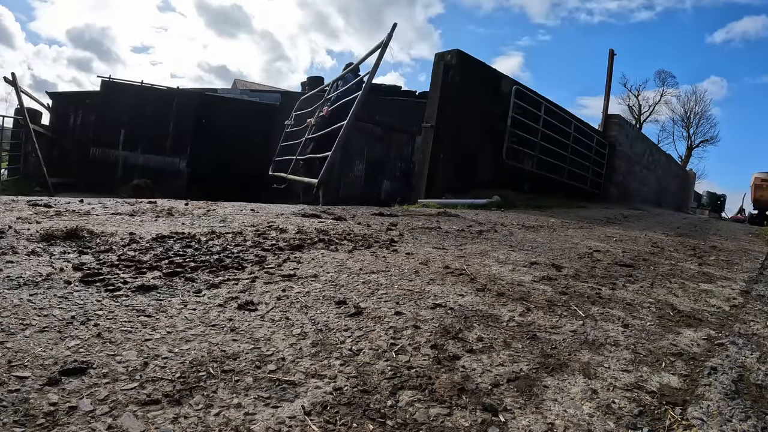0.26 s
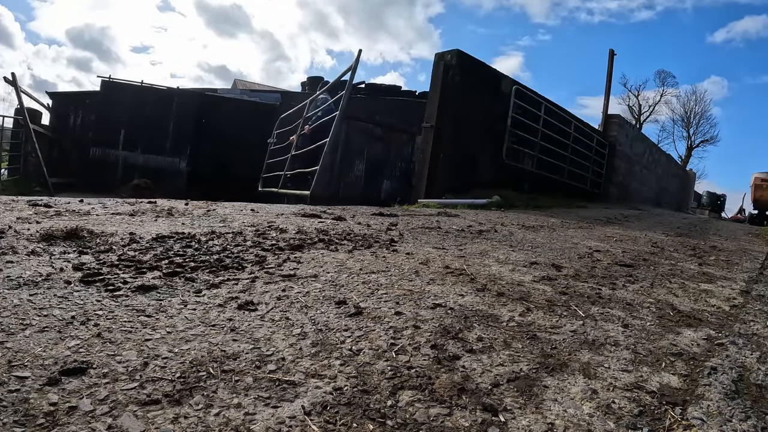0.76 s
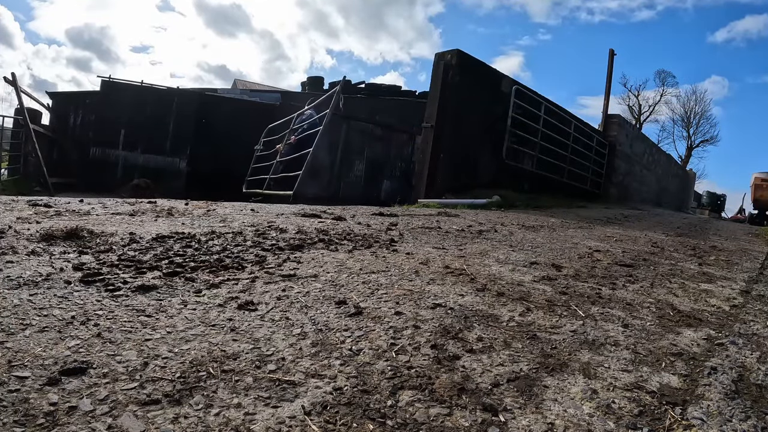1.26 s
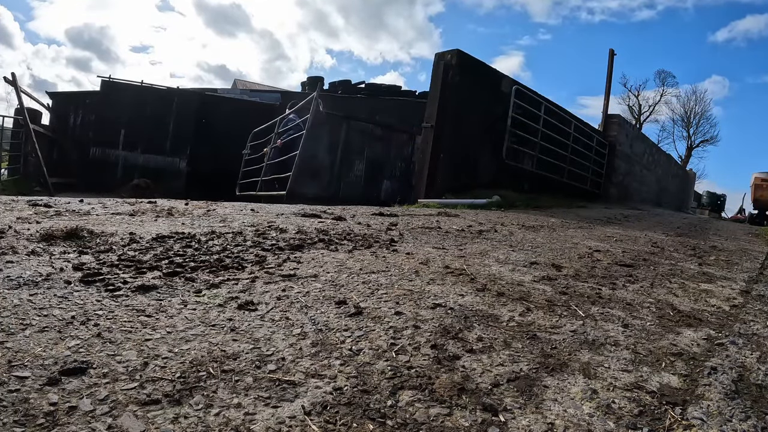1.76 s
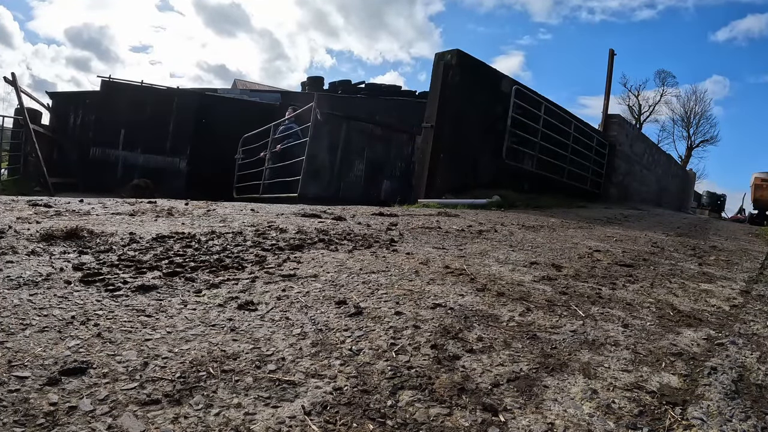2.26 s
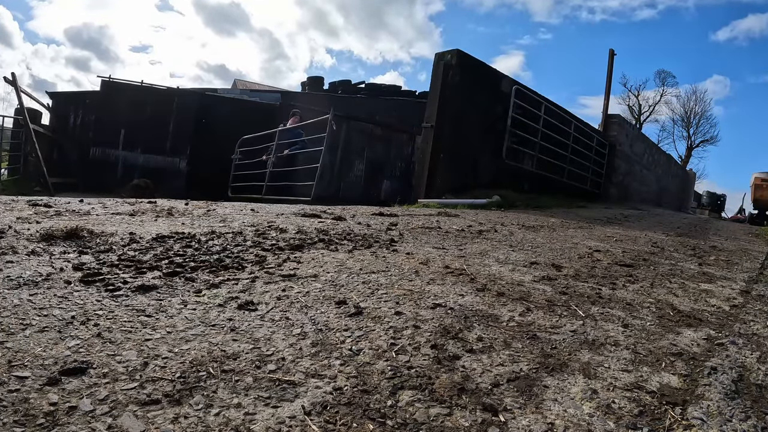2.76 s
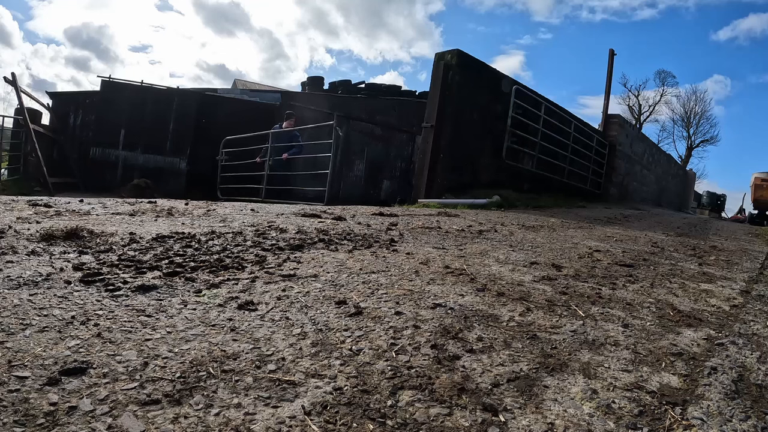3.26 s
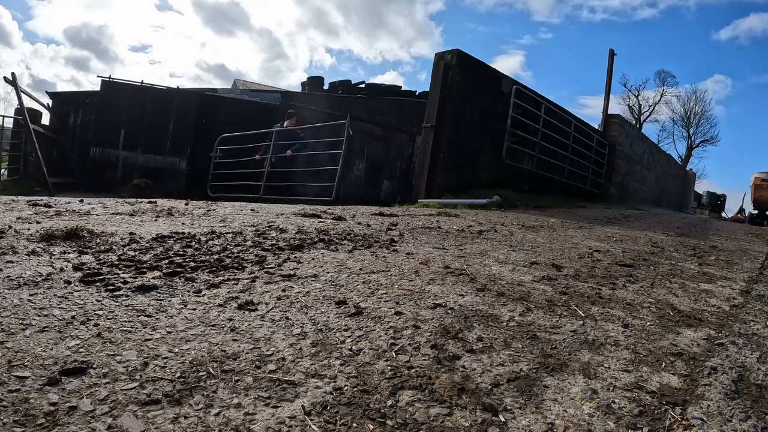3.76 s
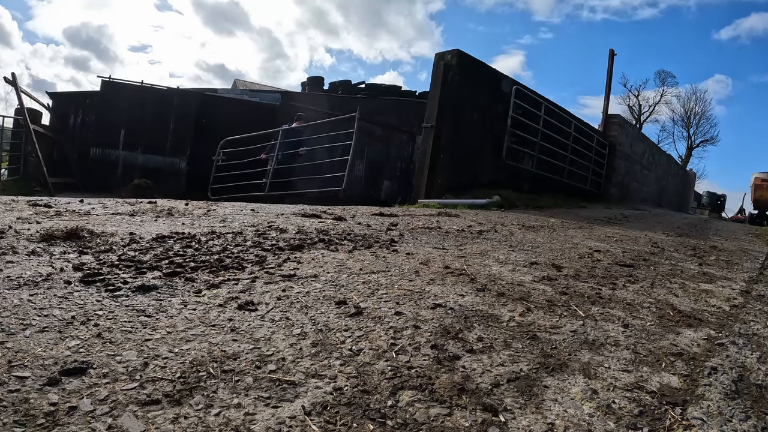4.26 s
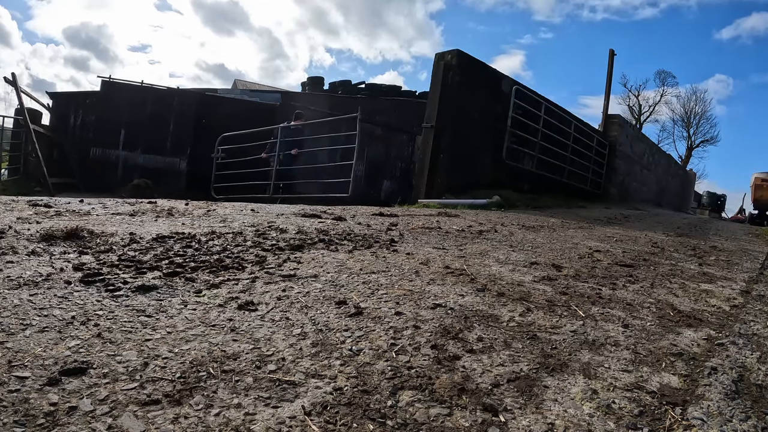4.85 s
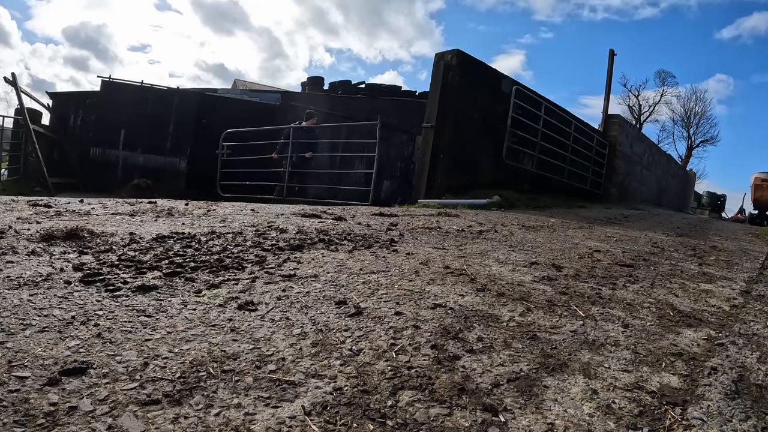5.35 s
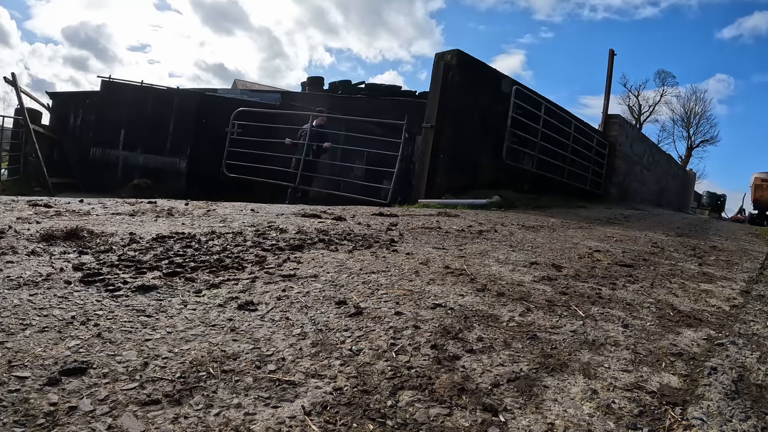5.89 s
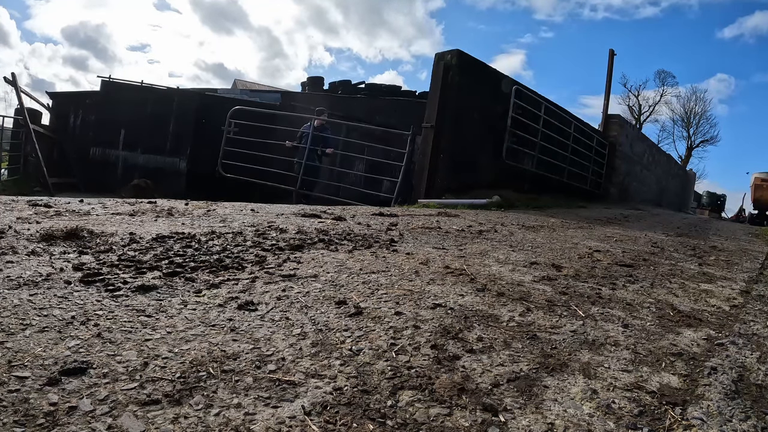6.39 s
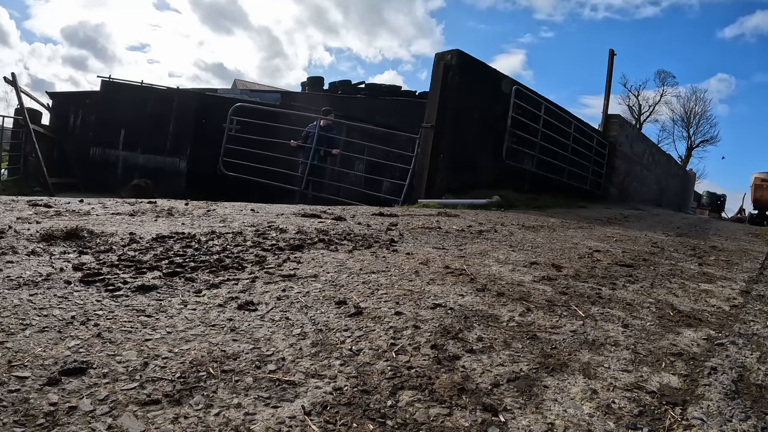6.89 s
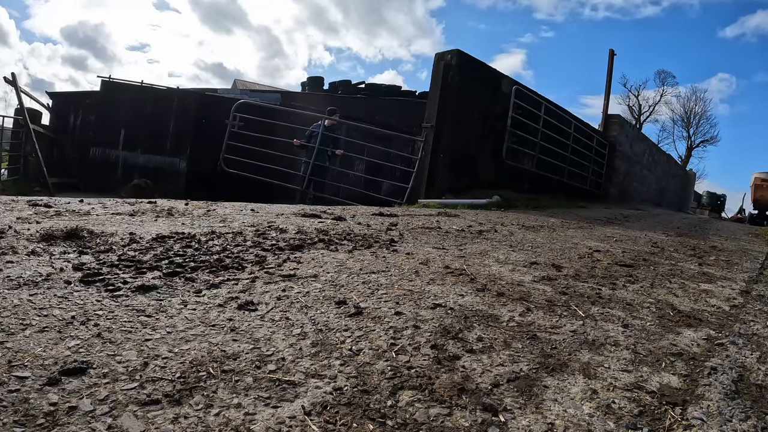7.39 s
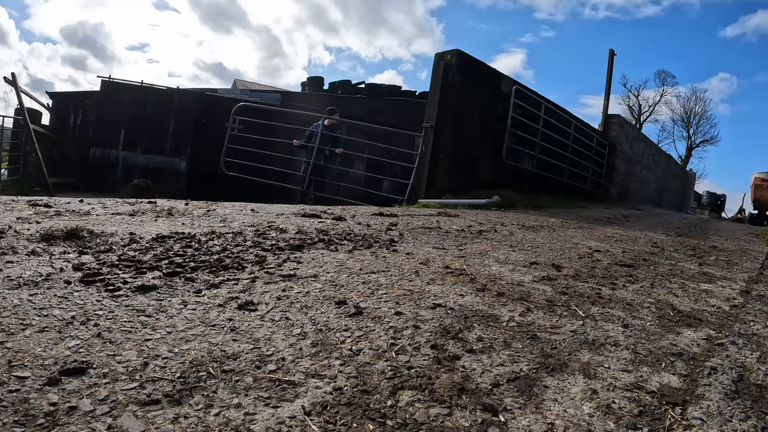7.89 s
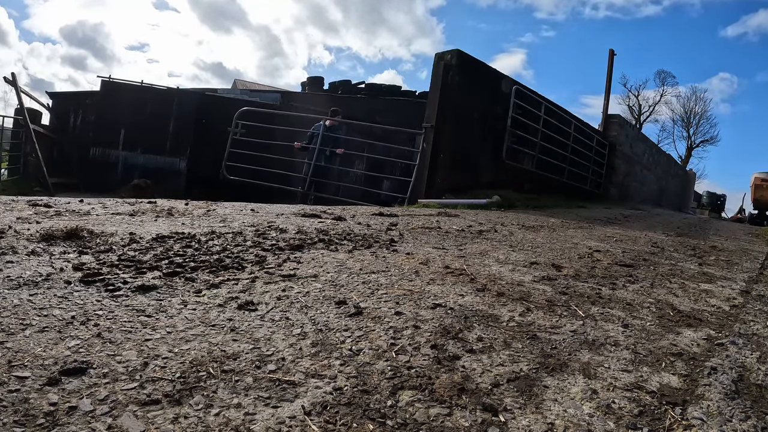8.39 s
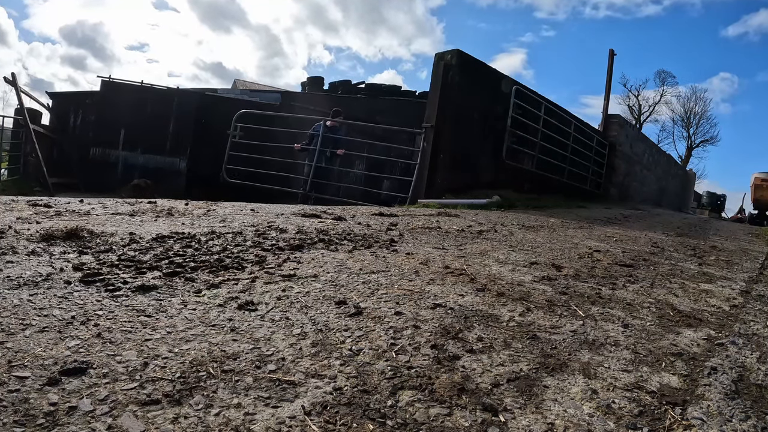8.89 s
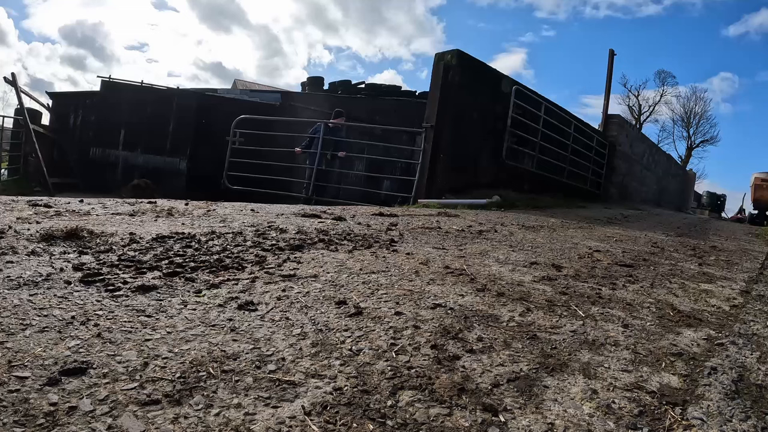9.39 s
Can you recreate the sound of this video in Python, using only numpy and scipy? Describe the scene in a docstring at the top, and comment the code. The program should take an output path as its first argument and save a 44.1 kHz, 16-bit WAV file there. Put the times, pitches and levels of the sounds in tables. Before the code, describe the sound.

In an open concrete farmyard, a tubular steel gate lands with a rapid burst of ringing clanks, repeated within the first second. Low wind buffets the microphone, swelling for several seconds while small birds chirp far off and steel squeaks thinly. Around six seconds the gate clanks again, its latch clinks repeatedly and one foot grinds along the concrete, then it quiets to wind and a last light clank. Walls echo softly.

```python
"""A tubular steel gate is walked across a concrete farmyard while wind buffets the microphone throughout.
First the frame clanks down in heavy bursts of noise and dying tones; boots scuff, as noisy clicks.
From about 1.5 s small birds sing far off and thin steel squeaks follow, all gliding sine tones.
The latch clinks at its own pitches, faintly around 2.5 and 3.8 s, then often from about 6 s, when one foot
drags in a dense stream of slips. All along, walls and sheds echo the yard sounds over soft air."""
import sys
import numpy as np
from scipy import signal
from scipy.fft import rfft, irfft
from scipy.io import wavfile
from scipy.ndimage import uniform_filter1d

SR = 44100
rng = np.random.default_rng(int(sys.argv[2]) if len(sys.argv) > 2 else 0)


def pcm_store(signal):
    """Save signal as 16-bit PCM."""
    levels = np.round(np.clip(np.atleast_2d(signal), -1, 1) * 32767)
    wavfile.write(sys.argv[1], SR, levels.astype(np.int16).T)


N = 424683
T = np.arange(N) / SR  # time in seconds

# the strongest tones of the gate's tubes: f/Hz, relative level/dB
TUBE_TONES = [(310, -5), (456, -4.5), (510, -3.5), (538, -4), (680, -6.5), (735, -4), (778, -8.5),
              (1028, -9.5), (1249, -4), (1324, -11.5), (1397, -6), (1637, -3), (1663, -2.5), (1742, -2.5),
              (1850, -10.5), (2100, -2), (2393, -1.5), (2556, -2.5), (2606, -4.5), (2741, -2.5),
              (2800, -4.5), (2852, -2.5), (3180, -7.5), (3813, -0.5), (4000, -2), (4230, -9)]
# how long the frame's crowd of weak tones rings (t60: time to fall by 60 dB): f/Hz, t60/s
RING_TIMES = [(300, 0.42), (1500, 0.36), (2300, 0.33), (2800, 0.47), (3400, 0.33), (8000, 0.1)]


def clanks(crowd, bounce=0.44, count=14):
    """The frame lands and its loose parts chatter for a moment and pump up the tubes, which sing on."""
    # the frame meets the ground: t/s, relative level/dB, weight of the low tones/dB, brightness/dB,
    # chatter time/s, tube tone that the blow favours f/Hz, lift of that tone/dB
    landings = [(.001, -33, 10, 6, 0.013, 1742, 13), (.042, -31, 3.5, 9, 0.014, 510, 9.5),
                (.064, -34, -3, 4, .014, 2556, -1), (.096, -29, 0.5, 6.5, .02, 3813, 4),
                (.122, -32, 1.5, 2.5, 0.023, 1637, 19), (.155, -32.5, 0.5, 5, 0.026, 538, 3),
                (.202, -31.5, 1.5, 4, .025, 2741, -4), (.625, -40, 1.5, 9.5, .015, 1663, 10.5),
                (0.7, -41, 1, 8, .02, 735, 12), (.725, -38.5, -8.5, 7.5, .0082, 2100, 6),
                (.737, -43.5, -5.5, -4, .02, 1663, 15.5), (.936, -32.5, -0.5, 5, 0.022, 2852, 10.5),
                (.962, -35, 6.5, 3.5, 0.015, 1397, 9), (1.004, -31, -1.5, 2.5, 0.0097, 1663, 5.5),
                (1.02, -30.5, -1.5, 7, 0.038, 2741, 1), (1.29, -53, 7.5, -7, 0.034, 2100, 6),
                (1.337, -53, 5.5, -7, 0.013, 2393, 16), (1.357, -54, 0, -1.5, 0.011, 2800, 12.5),
                (2.543, -51, 1, 6, 0.03, 3180, 14.5), (5.43, -46.5, 1, 0, .012, 2741, 7),
                (6.008, -40, -2, 10.5, 0.024, 1663, 11), (6.078, -44, .5, 9, .012, 2100, 9),
                (9.184, -49, 5, 7, 0.029, 735, 12), (9.201, -44, -7.5, 2.5, 0.023, 2800, 3)]
    # the crowd of weaker tones under a heavy blow: f/Hz, relative level/dB
    frame_spectrum = [(150, -23.5), (310, -2), (385, -11.5), (500, -5.5), (780, 4.5), (1080, -3.5),
                      (1550, 1.5), (1950, 1), (2750, 2), (4100, -0.5), (4800, -13.5), (8600, -17.5),
                      (15500, -43)]
    thud = 3  # a heavy landing lifts the deepest tones this many times more (in dB) than the low ones
    tube_db, tube_sustain = -11.5, 1.15  # the strong tones against the crowd: level, times longer to ring
    tube_split = .004  # like bars differ by about this share in pitch, so their tones beat
    hz, tone_table_db = np.transpose(TUBE_TONES)
    out = np.zeros(N)
    for s, db, weight_db, bright_db, chatter_s, favoured_hz, lift_db in landings:
        deep_db = thud * max(weight_db, 0)
        touch = [(180, deep_db), (330, weight_db), (1500, weight_db), (2400, 0), (4200, 0), (6000, bright_db)]

        # bounces thin out as they weaken; "late" counts in chatter times
        late = -np.log(1 - (np.arange(count) + rng.random(count)) / count)
        contacts = np.zeros(SR // 2)
        places = np.clip(late * chatter_s * SR, 1, len(contacts) - 1).astype(int)
        contacts[places] = bounce * rng.choice([-1, 1], count) * np.exp(-late / 3)
        contacts[0] = 1
        contacts /= np.linalg.norm(contacts)
        sound = blow(crowd, frame_spectrum, touch, crack_db=5.0, crack_s=0.0083, rise_s=0.00094)
        clash = signal.fftconvolve(sound, contacts)[:SR]

        # the place of the blow picks out one tone
        struck = np.arange(len(hz)) == np.argmin(abs(hz - favoured_hz))
        bars = hz * (1 + tube_split * rng.standard_normal((2, len(hz))))
        tone_db = tube_db + tone_table_db + read(touch, hz)
        t60 = tube_sustain * read(RING_TIMES, hz)
        tones = sum(modes(bar_hz, tone_db, t60) for bar_hz in bars)
        tones += modes(hz[struck], tone_db[struck] + lift_db, t60[struck])  # the struck bar sings out clean
        pumped = tones * (1 - np.exp(-2 * T[:SR] / chatter_s))
        add(out, s, amp(db) * (clash + pumped))
    return amp(-4.0) * out


def clinks(crowd, tick_db=10.5, tick_t60=0.021, rise_s=.0005):
    """The light latch bites with a short hard tick, stirs the high tones of the frame and rings on by itself."""
    # the loose latch knocks on the frame: t/s, relative level/dB, brightness/dB,
    # tone that the knock favours f/Hz
    knocks = [(2.543, -58.5, -6, 3117), (2.587, -58.5, -8, 2950), (2.602, -60, -8.5, 2700),
              (3.8233, -65.5, -9, 3120), (6.0459, -46, -17, 3980), (6.117, -44, -7.5, 2790),
              (6.251, -53.5, -0.5, 2400), (6.2734, -39.5, -8, 2790), (6.31, -54.5, -1, 2790),
              (6.344, -44, -9, 2790), (6.5041, -49, -9, 3120), (6.6384, -48, -6.5, 3120),
              (6.7353, -53, -10, 3120), (6.8176, -55, -3, 3860), (6.918, -52, -9.5, 3000),
              (7.17, -61, -3.5, 3000), (7.324, -55, -10, 3000), (7.399, -57, -1, 2790),
              (7.6374, -53, -8, 3120), (7.852, -51, -9.5, 3000), (8.0048, -58.5, -12, 3120),
              (8.1013, -56.5, -12, 3000), (8.182, -62.5, -13, 2790), (8.216, -58, -13, 3120),
              (8.272, -59.5, -17, 2790), (9.276, -57.5, -19, 2400), (9.3352, -58.5, -11, 2120)]
    # the crowd of weak frame tones that the latch stirs: f/Hz, relative level/dB
    stirred_spectrum = [(300, -52.5), (700, -11.5), (1400, -11.5), (2050, -5), (2230, -10.5), (2420, -1),
                        (2590, -2), (2800, -1.5), (3150, -2.5), (3400, -6), (3750, -1.5), (4150, -6.5),
                        (4400, -16), (4900, -19), (6050, -2.5), (7800, -16.5), (9000, -10), (11500, -26),
                        (15500, -46)]
    # the latch's own ring: f/Hz, relative level/dB, t60/s
    latch_tones = [(2094, -4, 0.36), (2370, -4, .29), (2730, -3, 0.38), (2790, 1, 0.51), (2950, -1.5, .18),
                   (3117, -0.5, .18), (3905, -6, 0.18), (3940, -4, 0.24), (4221, -4.5, 0.19)]
    hz, tone_db, t60 = np.transpose(latch_tones)
    knock_db, ring_db, favour_db = -3, -3.5, 6
    out = np.zeros(N)
    for s, db, bright_db, favoured_hz in knocks:
        touch = [(4200, 0.0028), (6000, bright_db)]
        knock = blow(crowd, stirred_spectrum, touch, crack_db=7, crack_s=0.025, rise_s=rise_s)
        struck = np.arange(len(hz)) == np.argmin(abs(hz - favoured_hz))
        tick = amp(tick_db) * modes(hz, tone_db, tick_t60)
        ring = amp(ring_db) * modes(hz, tone_db + favour_db * struck, t60)
        own_sound = (tick + ring) * (1 - np.exp(-T[:SR] / rise_s))
        add(out, s, amp(db) * (amp(knock_db) * knock + own_sound))
    return out


def blow(crowd, spectrum, touch, crack_db, crack_s, rise_s):
    """One second of the gate's answer to a contact: a crack and a crowd of weak tones."""
    t, hz = T[:SR], np.fft.rfftfreq(SR, 1 / SR)
    clang_band = (hz > 2200) & (hz < 4500)  # both parts are levelled by their strength in this band
    noise = amp(read(spectrum, hz)) * np.exp(2j * np.pi * rng.random(len(hz)))

    def levelled(part):
        return irfft(part * amp(read(touch, hz))) / np.std(irfft(part * clang_band))

    ring, crack = levelled(crowd * noise), levelled(noise)
    sound = fade(ring, RING_TIMES) + amp(crack_db) * crack * np.exp(-t / crack_s)
    return sound * (1 - np.exp(-t / rise_s))  # the shock takes a moment to spread along the bars


def drag(pressed_t60=0.14):
    """Many tiny slips of steel on concrete set the tubes humming; more pressure makes them harsher."""
    # a foot of the gate drags over concrete: t/s, relative level/dB, pressure as brightness/dB
    strokes = [(5.9, -62, -1), (6.1, -51.5, -8), (6.6, -54.5, -4.5), (6.9, -50, -8.5), (7.15, -52.5, -1.5),
               (7.33, -49.5, -3.5), (7.47, -50, 4), (7.61, -47, -1.5), (7.78, -61.5, 8), (7.9, -55, -3),
               (8.4, -62.5, -8)]
    # colour of the grinding: f/Hz, relative level/dB
    grind_spectrum = [(300, -15.5), (420, -10), (520, -1), (1000, -2), (1650, -4.5), (2300, -14),
                      (4000, -34.5), (5000, -50)]
    s, db, bright_db = np.transpose(strokes)
    hz = np.transpose(TUBE_TONES)[0]
    slips = grains(per_s=2700, spread_db=0.0) * amp(0.81 * wander(hz=29.8))
    hum = signal.fftconvolve(slips, modes(hz, np.zeros(len(hz)), pressed_t60))[:N]  # the ground damps the tubes
    grind = colour(unit(slips) + amp(-18.0) * unit(hum), grind_spectrum)
    dull = signal.sosfiltfilt(signal.butter(2, 1100, fs=SR, output="sos"), grind)
    bright = (grind - dull) * amp(np.interp(T, s, bright_db))
    return (dull + bright) * np.interp(T, s, amp(db), 0, 0)


def scuffs():
    """Grit crunches under a boot: coloured random clicks swell and fade with each press."""
    # boots scuff on grit: t/s, length/s, relative level/dB
    steps = [(0.44, 0.06, -61), (4.38, 0.14, -65), (4.467, 0.019, -63), (4.567, 0.52, -72),
             (5.48, 0.36, -67.5), (5.744, 0.064, -62), (8.565, 0.13, -67)]
    # colour of the crunch: f/Hz, relative level/dB
    grit_spectrum = [(800, -4.5), (2500, 0), (3900, 7), (4900, -8), (5800, -0.5), (8000, -8),
                     (12000, -10.5), (16000, -24)]
    press = np.zeros(N)
    for s, length, db in steps:
        add(press, s, amp(db) * np.hanning(int(length * SR)))
    crunch = grains(per_s=2000, spread_db=3)
    return press * colour(crunch, grit_spectrum)


def ring_and_squeaks():
    """A brief ring of a struck tube, then thin squeaks of steel: wavering glides with an overtone an octave up."""
    # the row at 0 s is the ring of the first clank, the others are squeaks:
    # t/s, length/s, first f/Hz, last f/Hz, relative level/dB, overtone against the main tone/dB
    steel_notes = [(0, 0.011, 1416, 1395, -17.5, -12), (2.11, 0.06, 969, 932, -45, -23),
                   (2.83, .095, 865, 908, -48, -13), (2.922, 0.046, 896, 916, -45, -22)]
    return whistles(steel_notes, waver=0.0058)


def birds(count=13, uneven_db=2):
    """Scattered clear notes, buzzy warbles, and one bird's run of falling notes, all as gliding tones."""
    # clear notes: t/s, length/s, first f/Hz, last f/Hz, relative level/dB
    clear_notes = [(1.45, .025, 5850, 6010, -58.5), (1.64, 0.017, 5640, 6320, -54.5),
                   (2.06, .11, 7550, 7030, -71.5), (3.655, 0.047, 5760, 8240, -67),
                   (4.6, .028, 3620, 4270, -52.5), (4.665, 0.03, 3730, 4160, -59.5),
                   (5.07, 0.067, 5250, 4100, -65.5), (5.28, .05, 5050, 4300, -68),
                   (5.36, 0.038, 3730, 4230, -54), (5.755, 0.035, 7500, 7500, -55),
                   (8.92, 0.097, 8000, 9300, -65.5), (8.99, 0.029, 3730, 3830, -54.5)]
    # buzzy warbles: t/s, length/s, first f/Hz, last f/Hz, relative level/dB
    buzzy_notes = [(4.69, 0.13, 6200, 5500, -66), (5.52, .08, 5900, 5400, -60.5),
                   (5.62, .11, 4900, 3780, -65)]
    # typical note of the run: length/s, first f/Hz, last f/Hz, relative level/dB
    run_note = (.04, 5450, 4300, -70.5)
    run_start_s, run_step_s = 2.456, .0925
    loud, high = rng.standard_normal((count, 2)).T
    starts = run_start_s + run_step_s * np.arange(count)
    pitches = 1 + 0.021 * high  # each note lies a little higher or lower
    length, first_hz, last_hz, db = run_note
    run = [(s, length, first_hz * pitch, last_hz * pitch, db + uneven_db * more)
           for s, pitch, more in zip(starts, pitches, loud)]
    return whistles(clear_notes, waver=0.013) + whistles(buzzy_notes + run, waver=0.018)


def whistles(rows, waver):
    """Gliding notes with soft ends; a row may name the level of an overtone."""
    out = np.zeros(N)
    jitter = 1 + waver * wander(hz=251)
    for s, length, first_hz, last_hz, db, *overtone_db in rows:
        u = np.linspace(0, 1, int(length * SR))  # progress through the note
        note_jitter = jitter[max(0, int(s * SR)):][:len(u)]
        pitch_hz = first_hz * (last_hz / first_hz) ** u * note_jitter
        phase = 2 * np.pi * np.cumsum(pitch_hz) / SR
        tone = np.sin(phase) + sum(amp(level) * np.sin(2 * phase) for level in overtone_db)
        add(out, s, amp(db) * tone * np.sqrt(np.sin(np.pi * u).clip(0)))
    return out


def yard(x, first_s=0.0047, wall_s=0.031, wall=0.41, shed_s=.06, shed=0.27):
    """Scattered echoes from sheds and walls, with two clearer returns."""
    # how long the scattered echoes last: f/Hz, t60/s
    echo_times = [(200, 1), (1500, 0.89), (3000, 0.7), (6000, 0.52), (14000, 0.27)]
    t = T[:SR]
    taps = rng.choice([-1., 1.], SR) * (rng.random(SR) < 2500 / SR) * (t > first_s)
    tail = fade(taps, echo_times)
    tail /= np.linalg.norm(tail)
    tail[int(wall_s * SR)] += wall
    tail[int(shed_s * SR)] += shed
    return signal.fftconvolve(x, tail)[:N]


def wind(lumpy_db=2.5, turbulence_db=2.0, buffet_db=1.0):
    """Slow pressure swings, and lumpy turbulence that rides on the breeze and flares up in every gust."""
    # the breeze swells and drops: t/s, relative turbulence/dB, relative slow buffeting/dB
    breeze = [(0.0, -39, -16.5), (.35, -57, -24.5), (.7, -50.5, -20), (1.24, -29.5, -13),
              (3.22, -22.5, -16.0), (4.4, -29.5, -15.5), (4.6, -36.5, -21), (4.8, -28, -14.5),
              (5.28, -38.5, -15.5), (5.45, -34, -11.5), (5.88, -29, -14), (6.15, -45.5, -16.5),
              (6.75, -50.5, -19), (6.95, -58, -28), (7.12, -59, -26.5), (7.35, -49.5, -23),
              (7.8, -45.5, -15.5), (8.7, -31.5, -15), (9.62, -46, -19)]
    # single gusts puff at the microphone: t/s, rise of the turbulence/dB
    puffs = [(1.43, 11), (2.05, 6.5), (2.28, 4), (2.562, 8), (3.091, 11.0), (3.66, 2.5), (4.28, 9.5),
             (5.031, 9), (6.46, 15), (6.7, 12.5), (7.94, 8), (8.3, 7), (8.76, 6.5)]
    # colour of the slow buffeting: f/Hz, relative level/dB
    buffet_spectrum = [(2, 6.5), (5, 7), (12, 9), (22, 9.5), (35, -1.5), (52, -16), (75, -28), (300, -96.5)]
    # colour of the turbulence: f/Hz, relative level/dB
    gust_spectrum = [(25, 0), (50, 11.5), (80, 2), (110, -6.5), (160, -15), (250, -24), (400, -35),
                     (700, -48.5), (2000, -58), (8000, -82)]
    gust_s = 0.073  # a gust builds and dies away over this time
    s, breeze_db, swing_db = np.transpose(breeze)
    puff_db = sum(db * np.exp(-((T - at) / gust_s) ** 2) for at, db in puffs)
    strength_db = np.interp(T, s, breeze_db) + puff_db
    buffet = colour(rng.standard_normal(N), buffet_spectrum)
    buffet /= np.sqrt(uniform_filter1d(buffet ** 2, size=5000))  # eddies of even strength
    gust = unit(colour(rng.standard_normal(N), gust_spectrum) * amp(lumpy_db * wander(hz=20.9)))
    swings = buffet * amp(np.interp(T, s, swing_db) + buffet_db)
    return swings + gust * amp(strength_db + turbulence_db)


def air(drift_db=1.46):
    """The soft wash of open country: coloured noise whose level drifts."""
    # colour of the wash: f/Hz, relative level/dB
    air_spectrum = [(100, -1.5), (450, 3), (900, 7), (1400, -1.5), (2200, -7), (3800, -7.5), (5000, -13.5),
                    (10000, -20.5), (15500, -29.5)]
    # its level over time, before the drift: t/s, level/dB
    air_levels = [(0, -51.5), (1.5, -60), (2.6, -60.5), (3.5, -65.5), (4.3, -58.5), (5.2, -59),
                  (5.8, -57.5), (7, -60.5), (9.63, -59.5)]
    level_db = np.interp(T, *np.transpose(air_levels)) + drift_db * wander(hz=24)
    return colour(rng.standard_normal(N), air_spectrum) * amp(level_db)


def modes(hz, db, t60):
    """One second of dying tones, each starting at a random point of its swing."""
    t = T[:SR]
    fall_db = db[:, None] - 60 * t / np.reshape(t60, (-1, 1))
    fall = np.float32(np.log(10) * fall_db / 20)
    phase = np.float32(2 * np.pi * (hz[:, None] * t + rng.random((len(hz), 1))))
    return (np.exp(fall) * np.sin(phase)).sum(0)


def grains(per_s, spread_db):
    """Sparse clicks, a few of them large."""
    size = amp(spread_db * np.minimum(rng.exponential(1, N), 4))
    return size * rng.standard_normal(N) * (rng.random(N) < per_s / SR)


def wander(hz):
    """Random wavering that holds only rates below hz, at rms 1."""
    return unit(irfft(rfft(rng.standard_normal(N)) * (np.fft.rfftfreq(N, 1 / SR) < hz), N))


def colour(x, spectrum):
    """Gives a long sound a spectrum, at rms 1."""
    return unit(irfft(rfft(x) * amp(read(spectrum, np.fft.rfftfreq(N, 1 / SR))), N))


def fade(x, t60s, size=256):
    """Lets every band die away at its own speed."""
    hz, t, bands = signal.stft(x, SR, nperseg=size)
    fall = amp(-60 * t / read(t60s, hz)[:, None])
    return signal.istft(bands * fall, SR, nperseg=size)[1][:len(x)]


def read(points, hz):
    """Reads a table along a logarithmic frequency axis."""
    f, value = np.transpose(points)
    return np.interp(np.log(hz + 1), np.log(f + 1), value)


def add(mix, s, sound):
    """Mixes a sound in at time s."""
    part = mix[max(0, round(s * SR)):][:len(sound)]
    part += sound[:len(part)]


def amp(db):
    """Decibels to gain."""
    return 10 ** (np.asarray(db) / 20)


def unit(x):
    """Scales to rms 1."""
    return x / np.sqrt(np.mean(x ** 2) + 1e-20)


def scene():
    """The gate, the boots and the birds echo in the yard; wind and air stay free of echo."""
    crowd = rng.random(SR // 2 + 1) < .2  # which 1 Hz steps hold a weak tone, the same for every blow
    frame, latch = clanks(crowd), clinks(crowd)
    rubbing = amp(-2.5) * drag() + amp(4.0) * scuffs()
    steel_tones, song = amp(-2.0) * ring_and_squeaks(), amp(-2.5) * birds()
    to_yard = amp(-9.0) * frame + amp(-9.5) * latch + amp(-7.5) * rubbing
    to_yard += amp(-9.5) * steel_tones + amp(-9.0) * song
    direct = frame + latch + rubbing + steel_tones + song
    return (direct + yard(to_yard) + wind() + air())[None]


def record(dry):
    """Soft ends and the band limit of the recorder."""
    edge_hz = 15750
    ends = np.minimum(1, np.minimum(T / .003, (T[-1] - T) / .02))
    lowpass = signal.firwin(511, edge_hz, window=("kaiser", 9), fs=SR)
    return signal.oaconvolve(dry * ends, lowpass[None], "same")


dry = scene()
out = record(dry)
pcm_store(out)
```